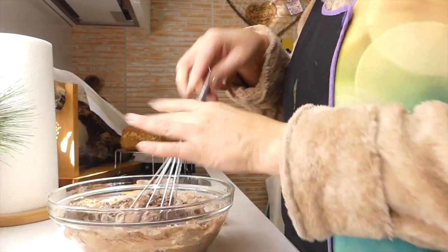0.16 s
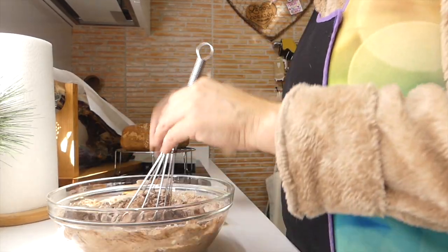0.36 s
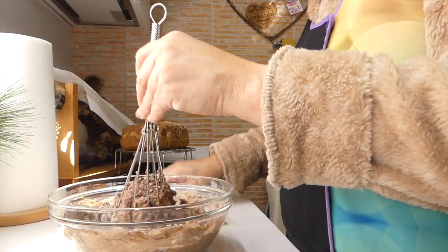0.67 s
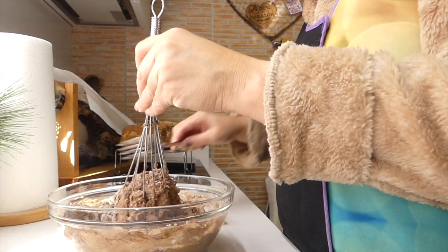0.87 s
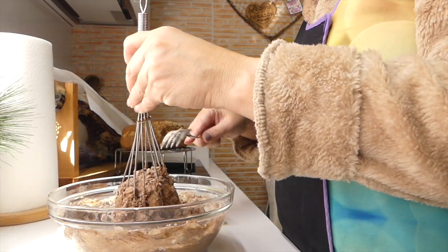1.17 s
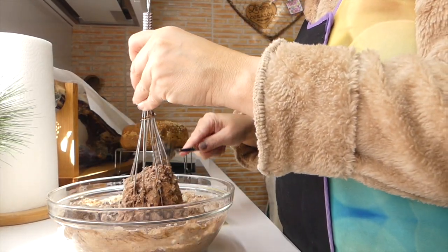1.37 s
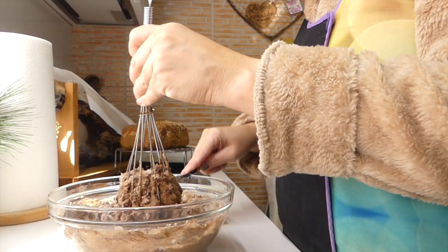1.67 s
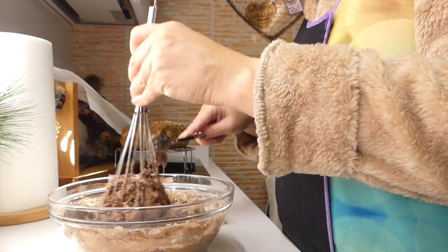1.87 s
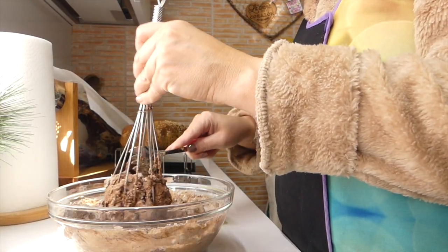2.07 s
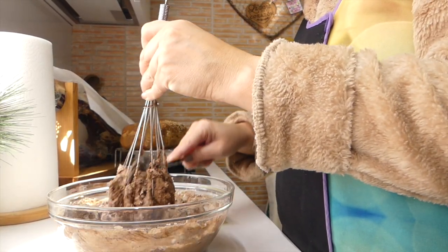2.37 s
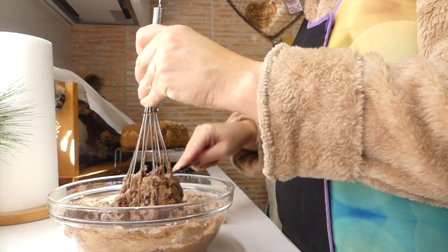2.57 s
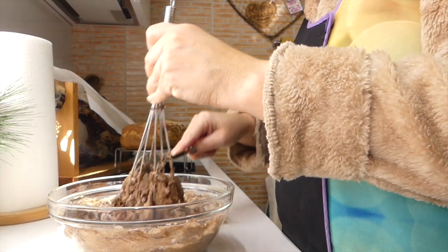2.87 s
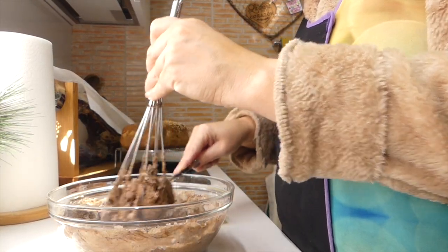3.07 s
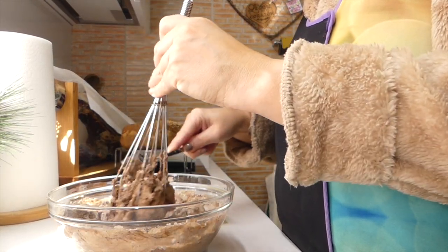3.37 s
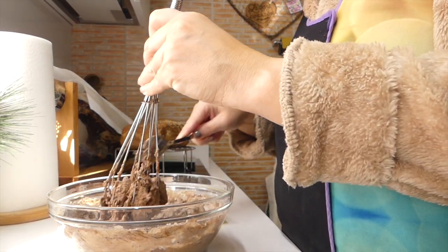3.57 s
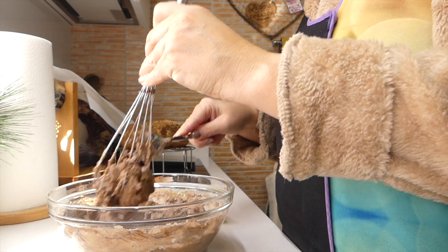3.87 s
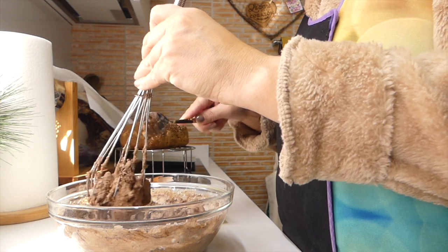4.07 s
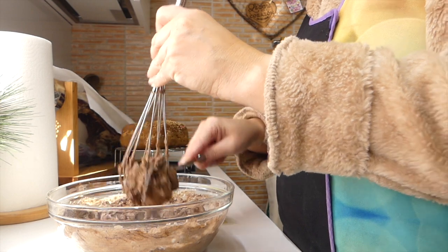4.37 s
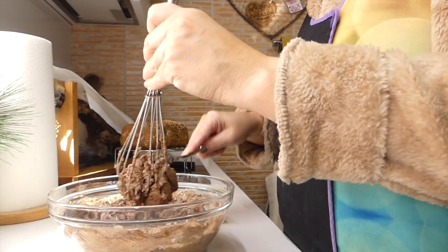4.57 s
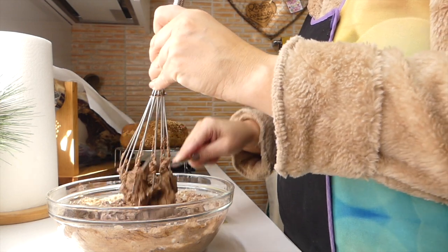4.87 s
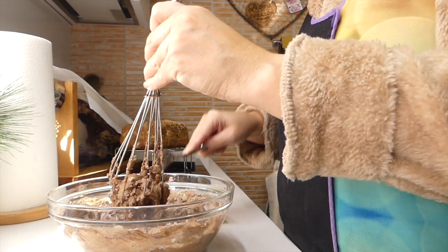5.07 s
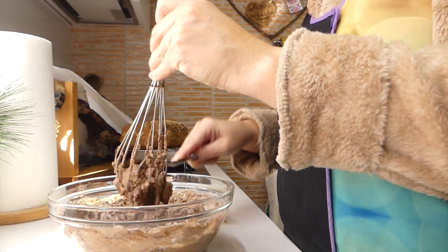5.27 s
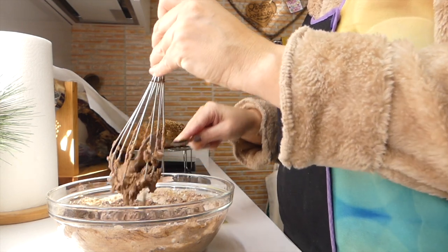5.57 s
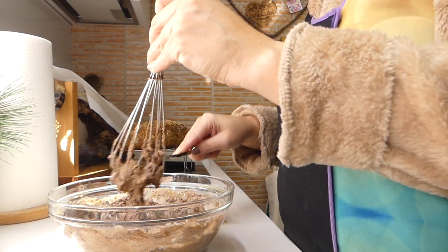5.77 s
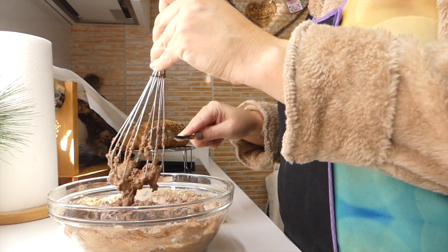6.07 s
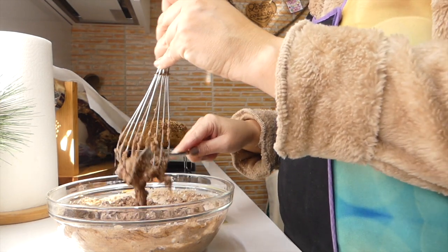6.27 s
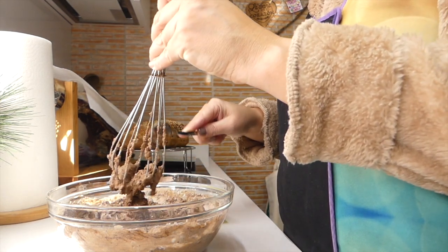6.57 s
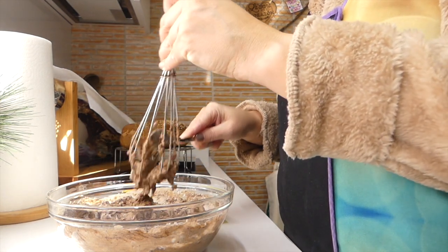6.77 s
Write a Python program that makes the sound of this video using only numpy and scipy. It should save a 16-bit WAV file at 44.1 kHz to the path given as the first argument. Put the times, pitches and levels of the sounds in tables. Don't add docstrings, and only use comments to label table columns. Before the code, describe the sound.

A refrigerator hums steadily with a faint casing rattle and soft room hiss throughout, in a tiled kitchen with a short bright echo. At about 0.45-0.7 s, dull knocks through a wooden board come with a gritty, bright steel scrape as a knife leaves a wire rack. Light ticks on whisk wires follow at 1.1 and 1.4 s, a sharp double tap at 1.9, more at 2.3, a small bump at 2.4, a scratchy stroke near 2.6 and a tap at 2.9. At 3.06 s the glass bowl is struck hard, a loud clank with a brief ring, and the level ducks momentarily. Strokes at 3.2 and 3.4, crisp taps at 3.6, slides at 4.2, taps at 4.75-5.0, softer wipes at 5.2-5.8, a strong scrape at 6.2 and a last light flick near 6.8 follow, with sticky batter drag beneath.

```python
import sys
import numpy as np
from scipy import signal
from scipy.fft import rfft, irfft, next_fast_len
from scipy.io import wavfile
from scipy.ndimage import map_coordinates

SR = 44100
rng = np.random.default_rng(int(sys.argv[2]) if len(sys.argv) > 2 else 0)


def volts_from_db(level):
    exponent = np.asarray(level, float) / 20
    return 10 ** exponent


def persist_wave(psi):
    counts = np.round(np.clip(psi, -1, 1) * 32767).astype(np.int16)
    wavfile.write(sys.argv[1], SR, np.atleast_2d(counts).T)


N = 304731


def unit(x):
    return x / np.sqrt(np.mean(x ** 2, -1, keepdims=True) + 1e-20)


def along(points, hz):
    point_hz, value = np.transpose(points)
    return np.interp(np.log(hz + 1), np.log(point_hz + 1), value)


def curves(rows):
    s, *columns = np.transpose(rows)
    t = np.arange(N) / SR
    return [np.interp(t, s, column, left=-120) for column in columns]


def wobble(rate, size=N):
    knots = rng.standard_normal(int(size * rate / SR) + 4)
    return map_coordinates(knots, [np.arange(size) * rate / SR])


def filtered(x, response):
    size = next_fast_len(x.shape[-1] + 8192)
    spectrum = rfft(x, size) * response(np.fft.rfftfreq(size, 1 / SR))
    return irfft(spectrum, size)[..., :x.shape[-1]]


def resonances(peaks, f):
    total = 0
    for k, (centre, width, db) in enumerate(peaks):
        total = total + (-1) ** k * volts_from_db(db) * 1j * f * width / (centre * centre - f * f + 1j * f * width)
    return total


def noise(spectrum, size=N):
    return unit(filtered(rng.standard_normal(size), lambda f: volts_from_db(along(spectrum, f))))


def add(track, s, sound):
    part = track[round(s * SR):][:len(sound)]
    part += sound[:len(part)]


def ring(hz, db, t60):
    t = np.arange(SR // 2) / SR
    swell = 1 - np.exp(-t * hz)
    return volts_from_db(db - 60 * t / t60) * np.sin(2 * np.pi * hz * t) * swell


# pitch in Hz, level in dB per Hz.
AIR_COLOUR = [(19, -55), (32, -29.5), (58, -32), (70, -34.5), (105, -15.5), (182, -11), (376, -14),
              (462, -9), (500, -13), (1030, -22), (1270, -22), (1650, -28), (2490, -29), (3230, -36),
              (15700, -36)]
# pitch in Hz, likeness from -1 to 1.
AIR_LIKENESS = [(60, -0.15), (300, -0.3), (600, -0.4), (1000, 0.56), (1600, -0.17), (3000, 0.074),
                (6800, 0.53), (15000, 0.63)]
# pitch in Hz, left minus right in dB.
AIR_BALANCE = [(60, 8), (150, -1.5), (300, -3), (600, -3.1), (1500, -0.3), (5000, 0.2)]


def air():
    def turn(f):
        return np.arccos(np.clip(along(AIR_LIKENESS, f), -1, 1)) / 2

    mid, side = filtered(rng.standard_normal((2, N)),
                         lambda f: volts_from_db(along(AIR_COLOUR, f)) * [np.cos(turn(f)), np.sin(turn(f))])
    pair = np.array([mid + side, mid - side])
    pair = filtered(pair, lambda f: volts_from_db(along(AIR_BALANCE, f) * [[.5], [-.5]]))
    return volts_from_db(-51) * pair / np.std(pair)


# pitch in Hz, left level in dB, right level in dB, right lead in radians,
# unsteadiness in dB.
COMPRESSOR_TONES = [(48.85, -69, -76.5, 1.54, .3), (195.4, -68, -63, .97, 1.5), (244.5, -68, -69, 1.5, 2.2),
                    (277, -78, -67, 1.2, 2.2), (471.9, -52, -49.8, .32, 1.3)]
# pitch in Hz, width in Hz, level in dB.
CASING_PEAKS = [(446, 18, 3.5), (611.5, 15, 2.5), (763.3, 34, 1.5), (938, 71, 0), (975, 27, 2),
                (1156, 36, 4.5), (1196.6, 33, 1.5), (1266.4, 63, 4.5), (1304, 65, 1.5), (2493, 35, -9)]
# time in seconds, level in dB.
CASING_LEVEL = [(0, -54.5), (.5, -56.5), (1.75, -54), (2.6, -59), (3.14, -53), (4.2, -57.5),
                (5.04, -55.5), (6.5, -62), (6.91, -57.5)]


def fridge():
    t = np.arange(N) / SR
    tones = 0
    for hz, left_db, right_db, lead, shake_db in COMPRESSOR_TONES:
        level = volts_from_db([[left_db + 2.5], [right_db + 1.5]] + shake_db * wobble(10))
        drift = 0.6 * shake_db * wobble(2.6)
        tones = tones + level * np.sin(2 * np.pi * hz * t + [[0], [lead]] + drift)
    casing_db, = curves(CASING_LEVEL)
    rattle = filtered(rng.standard_normal((3, N)), lambda f: resonances(CASING_PEAKS, f))
    shared, left, right = unit(rattle)
    rattle_level = volts_from_db(casing_db + 1 + 0.27 * wobble(4.9) + [[-1.5], [1.2]])
    return tones + rattle_level * (shared + 0.69 * np.array([left, right]))


# pitch in Hz, time to fall 60 dB in seconds.
ROOM_DECAY = [(200, 0.46), (1000, 0.43), (3000, 0.47), (6000, 0.38), (14000, 0.21)]


def kitchen(x):
    hz, t, cells = signal.stft(rng.standard_normal((2, SR // 2)), SR, nperseg=256)
    dying = volts_from_db(-60 * t / along(ROOM_DECAY, hz)[:, None])
    mid, side = signal.istft(cells * dying, SR, nperseg=256)[1]
    width = [(300, 0.73), (1000, .6), (3000, 0.44), (7000, .3), (15000, .55)]  # (Hz, side share)
    side = filtered(side, lambda f: along(width, f))
    wall_s = .006
    swell = np.clip(np.arange(len(mid)) / (wall_s * SR), .2, 1) ** 2
    tail = swell * np.array([mid + side, mid - side]) / np.linalg.norm(mid)
    delayed = np.pad(x, (70, 0))[None]
    return signal.fftconvolve(delayed, tail, axes=1)[:, :N]


# start in seconds, blow in dB.
KNOCKS = [
    (0.485, 5.5),
    (0.493, 3),
    (0.498, 8.5),
    (2.412, 1.5),
    (2.451, -13),
    (2.557, -15),
]
# pitch in Hz, width in Hz, level in dB.
BOARD_PEAKS = [(200.8, 54, -0.5), (370, 58, 3), (547, 340, -8), (990, 130, -2)]


def worktop():
    blows = np.zeros(N)
    for s, db in KNOCKS:
        add(blows, s, volts_from_db(db) * np.hanning(40) / 20)
    return filtered(blows, lambda f: resonances(BOARD_PEAKS, f))


# time in seconds, pressure in dB.
RACK_PRESSURE = [
    (0.47, -65),
    (0.488, -54.5),
    (0.53, -24.5),
    (0.562, -46.5),
    (0.585, -34.5),
    (0.618, -30),
    (0.646, -53.5),
    (0.72, -64),
]
# pitch in Hz, width in Hz, level in dB.
RACK_BARS = [
    [(1876, 15, -4.5), (4730, 100, -5.5), (7500, 47, -10), (8940, 38, 0.5), (10230, 60, 3.5), (11100, 43, -13), (13060, 35, 0.5), (13600, 88, -20.5), (13900, 45, -15.5), (14940, 43, -23)],
    [(2025, 11, -13), (3630, 22, -9), (4100, 33, -6.5), (5620, 33, -5.5), (6500, 33, -31), (7040, 75, -2), (8020, 40, 1), (8670, 35, 0), (9870, 61, 0.5), (12280, 58, -2.5), (12800, 35, 4), (14200, 29, -16), (14700, 29, -16), (15200, 36, -27)],
]
BAR_PASSING = (0.54, .6)


def rack():
    bright_db, = curves(RACK_PRESSURE + [(.76, -140)])
    body_db = -27.5 + 0.68 * np.where(bright_db > -100, bright_db, -300)
    grit = volts_from_db(2.1 * wobble(90) + 2.8 * wobble(500)) * rng.standard_normal(N)
    low = filtered(grit, lambda f: 1 / (1 + (f / 6500) ** 8))
    push = volts_from_db(bright_db - 0.5) * (grit - low) + volts_from_db(body_db + 19) * low
    second = np.interp(np.arange(N) / SR, BAR_PASSING, [0, 1])
    out = np.zeros(N)
    for share, bar in zip([1 - second, second], RACK_BARS):
        damped = [(hz, 3 * width, db) for hz, width, db in bar]
        out += filtered(share * push, lambda f: 0.17 * (f > 1600) + resonances(damped, f))
    return out


# start in seconds, blow in dB, ring in dB.
GLASS_BLOW = (3.0620, 24.9, -10.5)
# pitch in Hz, width in Hz, level in dB.
BOWL_BODY = [(200, 230, -8), (380, 260, -6.5), (734, 300, -7), (1264, 200, -6.5), (1770, 360, -10),
             (2432, 320, -10), (2818, 280, 1), (2944, 270, 3.5), (3210, 270, 1), (3660, 330, -4.5),
             (4650, 120, -8), (5810, 350, -3), (6290, 150, -6.5), (7150, 300, -25), (8210, 300, -5.5),
             (8450, 500, -6.5), (9350, 870, -11), (10480, 440, -16.5), (11200, 400, -19), (12200, 300, -16),
             (12800, 600, -14.5), (14200, 800, -19)]
RIM_PITCHES = [2095, 2119, 2760, 2867, 2906, 2984, 3218, 3259, 3350, 4543, 4586, 4608, 4645, 4670, 4750,
               5890, 6105]
# level in dB, time to fall 60 dB in seconds.
RIM_RINGING = [(-18.5, .2), (-17.5, 0.18), (-24.5, 0.1), (-22.5, 0.11), (-27, 0.26), (-20.5, 0.12),
               (-19, 0.18), (-27, 0.23), (-23.5, 0.13), (-22.5, 0.2), (-3.5, 0.28), (-8, 0.32), (-15, .25),
               (-16.5, 0.2), (-21, 0.15), (-27, .12), (-28, .2)]


def bowl():
    s, blow_db, ring_db = GLASS_BLOW
    blow, rim = np.zeros((2, N))
    add(blow, s, volts_from_db(blow_db) * np.array([1., -.3]))
    for hz, (db, t60) in zip(RIM_PITCHES, RIM_RINGING):
        add(rim, s, volts_from_db(ring_db) * ring(hz, db, t60))
    return filtered(blow, lambda f: resonances(BOWL_BODY, f)), rim


# pitch in Hz, level in dB per Hz.
RASP_COLOUR = [(1500, -36.5), (3500, -28.5), (5000, 2.5), (8000, 0), (12000, 1), (15800, -2.5)]
# pitch in Hz, level in dB per Hz.
BATTER_COLOUR = [(700, -19), (1500, -9.5), (2500, -5), (4000, -7), (6000, -13)]
# time of greatest force in seconds, peak in dB, batter share in dB.
BATTER_PUSHES = [
    (1.55, -45.5, 2.5),
    (1.68, -55, 5.5),
    (2.41, -46, -3),
    (2.92, -47, 5.5),
    (3.04, -38, -12),
    (3.45, -66, 19.5),
    (4.41, -47, -7),
    (4.94, -49.5, 3.5),
    (6.3, -52, -27.5),
]


def batter():
    t = np.arange(N) / SR
    rise_db_per_s, fall_db_per_s, rest_db = 136.5, 89, -69
    rasp, dull = np.full((2, N), volts_from_db(rest_db))
    for s, db, dull_db in BATTER_PUSHES:
        force = volts_from_db(db - np.maximum(rise_db_per_s * (s - t), fall_db_per_s * (t - s)))
        rasp += force
        dull += force * volts_from_db(dull_db)
    grit = volts_from_db(2.2 * wobble(31) + 0.58 * wobble(440))
    return grit * (rasp * volts_from_db(-14) * noise(RASP_COLOUR) + dull * volts_from_db(-18.5) * noise(BATTER_COLOUR))


# pitch in Hz, width in Hz, level in dB.
WHISK_WIRES = [(2500, 65, -4), (4450, 81, -17), (6280, 90, -0.5), (6950, 310, -10.5), (8200, 37, 6.5),
               (8340, 44, 0), (9440, 20, -6), (9100, 56, 0.5), (10150, 200, 3), (11500, 40, 7),
               (12900, 900, 0), (15070, 54, 0.5)]
# start in seconds, peak in dB, batter share in dB, 60 dB fall in seconds.
WIRE_TAPS = [(0.4923, -49, -4, .08), (1.1223, -47, -23, .073), (1.3618, -36.5, -20, 0.11),
             (1.5394, -48, -14, .069), (1.6975, -50.5, -14, .091), (1.9198, -27, -20, 0.052),
             (1.9268, -30, -18, .05), (1.9373, -50, -23, .083), (2.2613, -34.5, -26, .17),
             (2.2877, -34, -20.5, 0.096), (2.3396, -45.5, -21, 0.58), (2.8185, -45, -25, 0.071),
             (2.8716, -29, -21, 0.16), (3.6285, -36, -22.5, .03), (3.6325, -29, -19.5, .04),
             (3.639, -28.5, -23, 0.076), (4.377, -46.5, -8, 0.091), (4.746, -42.5, -20, .11),
             (4.771, -37.5, -21, 0.12), (4.8466, -28, -15.5, 0.023), (4.855, -33, -23.5, 0.055),
             (4.9968, -37, -17, .05), (5.007, -39, -21.5, 0.069), (6.0455, -53, -32, 0.095),
             (6.2201, -30.5, -12.5, 0.068), (6.7733, -45, -12, 0.15), (6.875, -55, -14, 0.13)]
# start in seconds, peak in dB, batter share in dB, 60 dB fall in seconds.
WIRE_STROKES = [(0.4344, -52, -20, .1), (2.57, -34.5, -22, .12), (2.8853, -51.5, -21, .088),
                (3.0094, -36.5, -7.5, 0.12), (3.2327, -37.5, -7.5, .13), (3.403, -32, -23, .09),
                (3.9546, -45.5, -12, 0.092), (4.1944, -36, -27, .1), (4.2058, -32, -27.5, 0.09),
                (4.2344, -38, -24, 0.34), (4.9494, -48, -10, 0.24), (5.775, -39.5, -19, 0.09),
                (5.7902, -51, -22, 0.19), (6.2322, -24, -20.5, .065), (6.2894, -56, -13.5, 0.088),
                (6.786, -43, -18.5, 0.065)]
# start in seconds, peak in dB, batter share in dB.
WIRE_WIPES = [(1.4344, -44, -31), (2.556, -44, -16.5), (2.9844, -54.5, 0.5), (4.3992, -55.5, -8),
              (4.5242, -46, -16), (4.583, -45.5, -12), (5.2344, -40.5, -19.5), (5.331, -43, -17.5),
              (5.639, -52, -24), (6.12, -44, -24), (6.3494, -41, -16.5), (6.767, -37, -17)]
# start in seconds, peak in dB, pitch in Hz, 60 dB fall in seconds.
WIRE_PINGS = [
    (1.362, -40.5, 7820, 0.063),
    (1.919, -39, 5380, 0.011),
    (2.56, -54, 3044, 0.14),
    (2.819, -50, 12600, 0.054),
    (6.771, -54, 2800, 0.041),
    (6.793, -39, 12700, 0.029),
]


def knife():
    out, t = np.zeros(N), np.arange(SR // 4) / SR
    size = len(t)
    tap_rise_s, stroke_rise_s, wipe_rise_s, wipe_fall_s = .0003, .0055, .015, .09
    contacts = [(*row, tap_rise_s) for row in WIRE_TAPS]
    contacts += [(*row, stroke_rise_s) for row in WIRE_STROKES]
    contacts += [(*row, wipe_fall_s, wipe_rise_s) for row in WIRE_WIPES]
    for s, db, dull_db, fall, rise in contacts:
        centre_hz = 12870 * 2 ** (3.3 * max(dull_db + 25.5, 0))
        wires = [(hz, width, level + 5 * rng.standard_normal()) for hz, width, level in WHISK_WIRES]
        wires.append((centre_hz, 900, 3))
        rasp = unit(filtered(noise(RASP_COLOUR, size), lambda f: 1 + np.abs(resonances(wires, f))))
        grit = volts_from_db(3.2 * wobble(400, size) + 2.2 * wobble(90, size))
        fall = max(fall, .01)
        swell = np.sin(np.pi / 2 * np.minimum(t / (3 * rise), 1)) ** 2
        shape = swell * volts_from_db(-60 * np.maximum(t - 3 * rise, 0) / fall)
        if rise < .002:
            shape = shape * (1 + .8 * np.exp(-t / .002))
        wet = volts_from_db(dull_db + 9.5) * noise(BATTER_COLOUR, size)
        add(out, s - rise, volts_from_db(db - 10.5) * shape * grit * (rasp + wet))
    for s, db, hz, t60 in WIRE_PINGS:
        add(out, s, ring(hz, db, t60) + ring(hz * .975, db - 4, t60))
    return out + batter()


def scene():
    no_bass = signal.butter(2, 100, 'high', fs=SR, output='sos')
    steel, body, rim = signal.sosfilt(no_bass, [knife() + rack() + worktop(), *bowl()])
    near = steel * volts_from_db([[.1], [-.1]]) + (body + rim) * volts_from_db([[1.8], [-1.8]])
    steel_room = volts_from_db(-1) * kitchen(steel)
    glass_room = volts_from_db([[3], [2]]) * kitchen(body + volts_from_db(-9) * rim)
    return near + steel_room + glass_room + fridge() + air()


def low_pass(x):
    return signal.sosfilt(signal.butter(12, 16800, fs=SR, output="sos"), x)


def record(dry):
    clipped = dry / (1 + np.abs(dry / 1.2) ** 4) ** (1 / 4)
    need_db = np.minimum(-14 - 20 * np.log10(np.abs(clipped).max(0) + 1e-9), 0)
    climb_db = 125 * np.arange(N) / SR
    gain_db = np.minimum(np.minimum.accumulate(need_db - climb_db) + climb_db, 0)
    lag = np.exp(-1 / (.009 * SR))
    slow_db = signal.lfilter([(1 - lag) ** 2], [1, -2 * lag, lag ** 2], gain_db)
    finished = filtered(clipped * volts_from_db(slow_db), lambda f: np.where(f < 15760, 1, volts_from_db(-54)))
    return low_pass(finished)


dry = scene()
out = record(dry)
persist_wave(out)
```